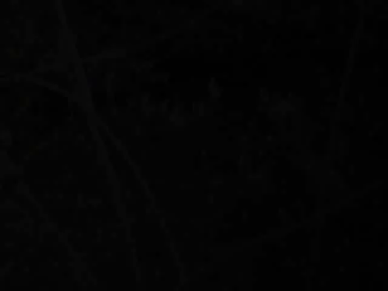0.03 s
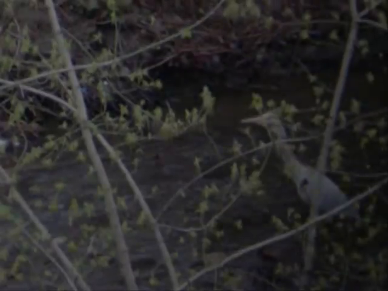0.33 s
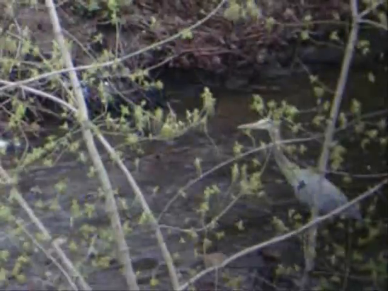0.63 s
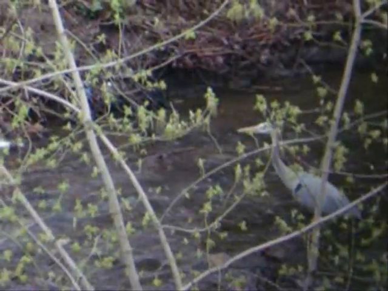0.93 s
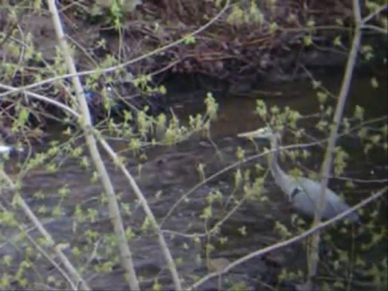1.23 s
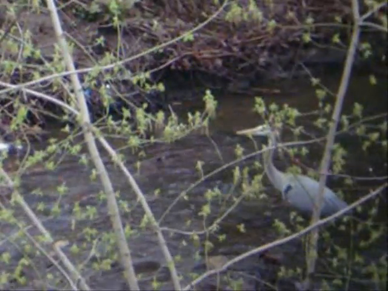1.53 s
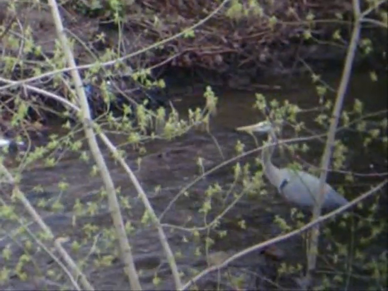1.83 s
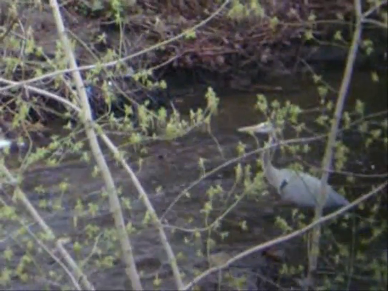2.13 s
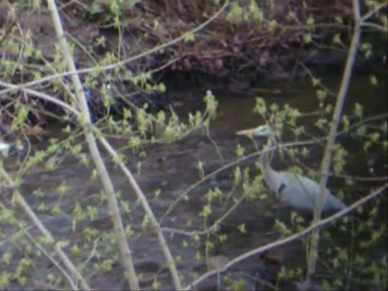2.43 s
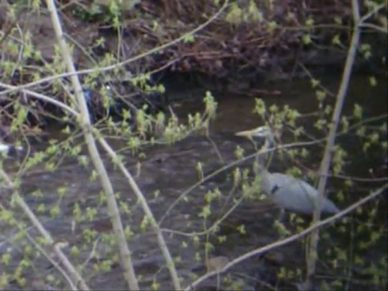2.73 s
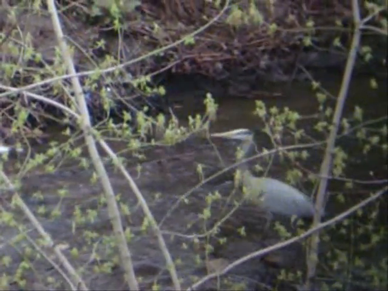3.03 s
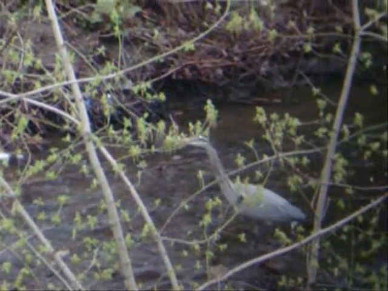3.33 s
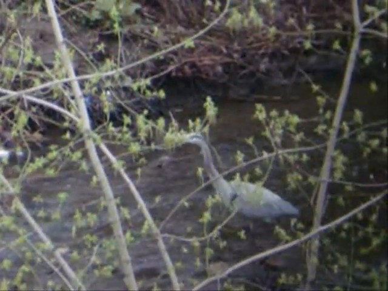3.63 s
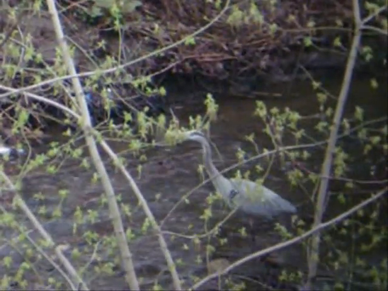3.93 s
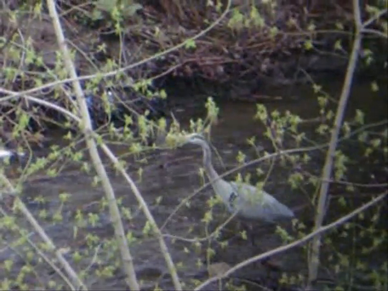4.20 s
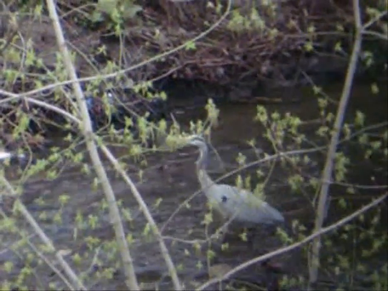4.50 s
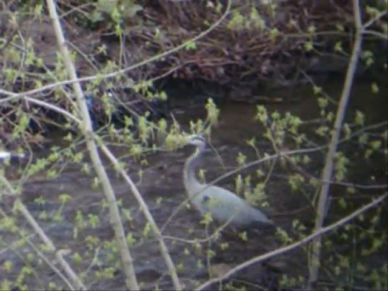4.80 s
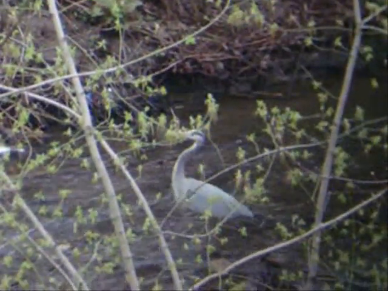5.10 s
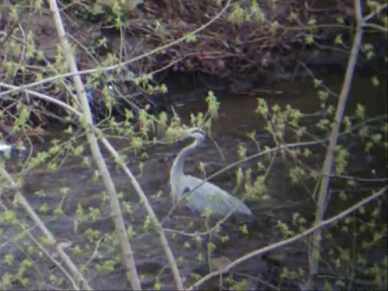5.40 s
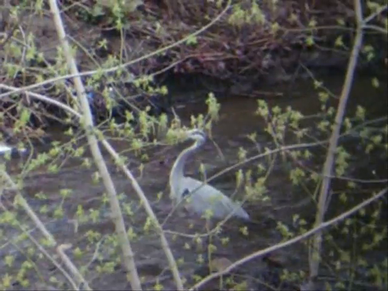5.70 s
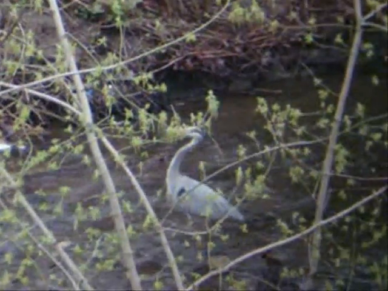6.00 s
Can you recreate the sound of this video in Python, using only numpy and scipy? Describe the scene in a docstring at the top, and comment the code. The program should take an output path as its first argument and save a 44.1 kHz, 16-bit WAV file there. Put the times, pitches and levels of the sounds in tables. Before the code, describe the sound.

A shallow creek rushes steadily over a low outdoor rumble, with faint songbird chirps and a thin camera motor whine.

```python
"""Woodland creek with songbirds

A shallow creek rushes over the low rumble of the open air: far bubbles merge into noise, nearer
ones ring as damped resonators. Songbirds call in gliding tones, scattered by trunks and banks.
A small camera picks it up: its motor whines and hums, its drive sets the case ticking,
its microphone is dull, and the sound fades in from silence."""
import sys
import numpy as np
from scipy import signal
from scipy.fft import rfft, irfft, next_fast_len
from scipy.io import wavfile

SR = 44100
rng = np.random.default_rng(int(sys.argv[2]) if len(sys.argv) > 2 else 0)


def store_pcm(level_fs):
    """Save levels as 16-bit WAV."""
    pcm = np.round(np.clip(level_fs, -1, 1) * 32767).astype(np.int16)
    wavfile.write(sys.argv[1], SR, np.atleast_2d(pcm).T)


N = 271215
TIME = np.arange(N) / SR
TURNS_PER_S = 14.985  # rotation of the camera's drive

# spectrum of the rushing current: (frequency [Hz], relative density [dB])
RUSH_SPECTRUM = [(150, -22), (340, -4), (500, -3.5), (630, 0), (870, -2.5), (1000, -10.5), (1200, -15),
                 (1420, -13), (1680, -24), (1900, -23.5), (2200, -21), (2650, -23), (3150, -27),
                 (4800, -31), (7000, -34.5)]


def from_db(db):
    """Amplitude ratio of a level in decibels."""
    return 10 ** (np.asarray(db) / 20)


def rms_one(x):
    """Normalisation to unit power."""
    return x / np.sqrt(np.mean(x ** 2) + 1e-20)


def gain_curve(spectrum):
    """Gain as a function of frequency: levels interpolated on a logarithmic axis."""
    known_hz, db = np.transpose(spectrum)
    return lambda hz: from_db(np.interp(np.log(np.maximum(hz, 1)), np.log(known_hz), db))


def filtered(x, gain_at):
    """Zero-phase filtering: the spectrum is multiplied by a gain curve."""
    size = next_fast_len(N + SR // 2)
    hz = np.arange(size // 2 + 1) * SR / size
    return irfft(rfft(x, size) * gain_at(hz), size)[:N]


def drift(corner_hz):
    """Slow random modulation: low-passed noise of about unit rms."""
    step, settling = 40, 2000
    pole = np.exp(-2 * np.pi * step * corner_hz / SR)
    white = rng.standard_normal(N // step + settling + 2)
    slow = signal.lfilter([1], [1, -2 * pole, pole * pole], white)[settling:]
    return np.interp(np.arange(N) / step, np.arange(len(slow)), rms_one(slow))


def noise(spectrum):
    """Spectral shaping turns white noise into coloured noise of unit rms."""
    return rms_one(filtered(rng.standard_normal(N), gain_curve(spectrum)))


def tone(hz):
    """A sinusoid of unit rms whose phase is the integral of its frequency."""
    return np.sqrt(2) * np.sin(2 * np.pi * (np.cumsum(hz) / SR + rng.random()))


def note(hz):
    """Amplitude modulation: a pure tone swells and dies under an arched envelope."""
    return np.sqrt(np.abs(np.sin(np.linspace(0, np.pi, len(hz))))) * tone(hz)


def ring(clicks, hz, t60):
    """Damped resonator: a unit impulse excites a decaying sine of unit amplitude."""
    r, w = np.exp(-np.log(1000) / (t60 * SR)), 2 * np.pi * hz / SR
    return signal.lfilter([0, np.sin(w)], [1, -2 * r * np.cos(w), r * r], clicks + 1e-18)


def ages(length):
    """Seconds since the onset of a sound."""
    return np.arange(int(length * SR)) / SR


def add(out, onset, sound):
    """Superposition of a sound at its onset in seconds."""
    start = int(onset * SR)
    out[start:start + len(sound)] += sound[:max(N - start, 0)]


def air(rumble_db=-30.5, swell_db=.5):
    """Coloured noise swells gently as a far rumble; two narrow noise bands waver in it as drones."""
    # rumble of the open air: (frequency [Hz], relative density [dB])
    rumble_spectrum = [(20, -24.5), (55, -18), (72, -7), (105, -4), (122, -0.5), (200, -0.5), (290, -2.5),
                       (380, -9.5), (600, -23.5), (1200, -44.5)]
    # low drones: (centre [Hz], half-width [Hz], rms level [dB])
    drones = [(121.8, 6.2, -43.5), (423, 25.4, -42)]
    out = from_db(rumble_db + swell_db * drift(4.5)) * noise(rumble_spectrum)
    for centre, width, db in drones:
        band = filtered(rng.standard_normal(N), lambda hz: 1 / (1 + ((hz - centre) / width) ** 2))
        out += from_db(db) * rms_one(band)
    return out


def motor(flutter=.00095, throb_db=1.46, hum_hz=43.3, hum_db=-47, hum_flutter=.013):
    """Modulation by rotation: the whine flutters with speed and throbs once a turn, over a deep hum."""
    # spectral lines of the motor: (frequency [Hz], rms level [dB])
    whine_lines = [(2546, -66), (3514, -64.5), (3638.5, -51), (3748, -63.5), (3874, -60), (4627, -72),
                   (4748, -71), (4826, -73), (5399, -76), (5426, -78), (5599, -77.5)]
    speed = 1 + flutter * drift(17.2)
    throb = from_db(throb_db * np.sin(2 * np.pi * TURNS_PER_S * TIME))
    whine = throb * sum(from_db(db) * tone(hz * speed) for hz, db in whine_lines)
    return whine + from_db(hum_db) * tone(hum_hz * (1 + hum_flutter * drift(5.0)))


def ticking(uneven_db=2.0):
    """Impact excitation: the drive's contacts recur every turn and ring the modes of the case."""
    # contacts of the drive: (delay from the start of a turn [s], impulse level [dB])
    contacts = [(0.043, -42.5), (0.0066, -49), (0.071, -52.5), (0.057, -53.5)]
    # modes of the camera's case: (frequency [Hz], gain [dB], t60 [s])
    case_modes = [(4400, -4, .003), (5000, -6.5, .004), (5560, -3, 0.0059)]
    clicks, turns = np.zeros(N), np.arange(0, N / SR, 1 / TURNS_PER_S)
    for delay, db in contacts:
        at = ((turns + delay) * SR).astype(int)
        at = at[at < N]
        clicks[at] += from_db(db + uneven_db * rng.standard_normal(len(at)))
    return sum(from_db(db) * ring(clicks, hz, t60) for hz, db, t60 in case_modes)


def twitters(per_s=4, length_s=.045, low_hz=2100, high_hz=2845, db=-54.5, spread_db=5.0):
    """Linear chirps: birds deep in the wood give short rising or falling notes at random times."""
    out, age = np.zeros(N), ages(length_s)
    for when, pitch, slope, strength in rng.random((int(per_s * N / SR), 4)):
        hz = low_hz + pitch * (high_hz - low_hz)
        glide = 1 + .072 * (2 * slope - 1) * age / length_s
        add(out, when * N / SR, from_db(db + spread_db * (strength - .5)) * note(hz * glide))
    return out


def whistles(slide_share=.05, slide_s=.014):
    """Exponential glide: the pure notes of far birds settle onto their pitch from above."""
    # thin notes: (time [s], duration [s], pitch [Hz], level [dB])
    notes = [(2.67, .04, 2710, -50), (3.415, .087, 3155, -51), (3.745, .085, 3105, -52.5),
             (4.91, .055, 2440, -51), (4.98, .077, 2140, -46.5), (5.609, .068, 2450, -48),
             (5.695, 0.052, 2170, -48), (5.695, .047, 3690, -52)]
    out = np.zeros(N)
    for onset, length, hz, db in notes:
        slide = 1 + slide_share * np.exp(-ages(length) / slide_s)
        add(out, onset, from_db(db) * note(hz * slide))
    return out


def reedy_call(onset_s=5.635, length_s=.11, pitch_hz=1583, sag_hz=6.0):
    """Harmonics of a missing, slightly sagging fundamental give one far call its reedy timbre."""
    # partials of the call: (harmonic number, level [dB])
    partials = [(3, -54.5), (4, -56)]
    out = np.zeros(N)
    fundamental = np.linspace(pitch_hz + sag_hz, pitch_hz - sag_hz, int(length_s * SR))
    for harmonic, db in partials:
        add(out, onset_s, from_db(db) * note(harmonic * fundamental))
    return out


def throat(hz, centre_hz=2150, half_width_hz=75, leak_db=-17):
    """Resonance of the songbird's throat: one steep peak of gain over a weak leak."""
    return np.hypot(from_db(leak_db), 1 / (1 + ((hz - centre_hz) / half_width_hz) ** 2))


def sweeps(steepness=6.6, swell_db=14):
    """Source and filter: a tone climbs an S-curve, shaped by the throat, as the bird pushes harder."""
    # upward sweeps: (time [s], duration [s], from [Hz], to [Hz], source level at midpoint [dB])
    rises = [(4.447, 0.064, 2260, 2710, -34.5), (5.869, .33, 1696, 2490, -39.5)]
    out = np.zeros(N)
    for onset, length, from_hz, to_hz, db in rises:
        progress = ages(length) / length - .5
        hz = from_hz + (to_hz - from_hz) / (1 + np.exp(-steepness * progress))
        add(out, onset, from_db(db + swell_db * progress) * throat(hz) * note(hz))
    return out


def slurs(rest_hz=1350, sag_hz=1060, plunge_hz=1260, waver_db=1.5):
    """Swept resonance: each accented tone plunges, flares at the throat's peak and trails off lower."""
    # the songbird's run of downward slurs: (time [s], level before the accent [dB])
    run = [(0.286, -37), (0.479, -36.5), (0.677, -36), (0.877, -35.5), (1.085, -34), (1.433, -32),
           (1.805, -34)]
    out = np.zeros(N)
    for onset, db in run:
        stretch = .86 + .12 * onset  # later slurs are drawn out
        age = ages(.09 * stretch) / stretch
        plunge = np.exp(-(age / .0098) ** 2)
        hz = rest_hz + sag_hz * np.exp(-age / .068) + plunge_hz * plunge
        attack = np.minimum(age / .004, 1)
        envelope = attack * np.exp(-age / .18) * throat(hz)
        accent_db = (27 - 11 * onset) * np.exp(-(age / .0058) ** 2)  # softens along the run
        level_db = db + accent_db + waver_db * drift(90.0)[:len(age)]
        add(out, onset, from_db(level_db) * envelope / envelope.max() * tone(hz))
    return out


def wood(calls, wet_db=-6.0, t60=.71):
    """Reverberation: trunks and banks scatter a short diffuse tail after each call."""
    age = ages(.5)
    tail = rng.standard_normal(len(age)) * np.exp(-np.log(1000) * age / t60)
    return calls + from_db(wet_db) * signal.fftconvolve(calls, tail / np.linalg.norm(tail))[:N]


def bubbles(flow, per_s=1500, spread_db=4.0, t60_cycles=14.3, pitches=28):
    """Bubble resonance: born at random, more often in strong flow, each rings for a few cycles."""
    strength = from_db(spread_db * np.minimum(rng.exponential(1, N), 4))
    polarity = rng.choice([-1, 1], N)
    born = rng.random(N) < per_s * flow / SR
    kicks = strength * polarity * born
    pitch_index = rng.integers(0, pitches, N)
    out = np.zeros(N)
    for k, hz in enumerate(np.geomspace(400, 5500, pitches)):
        out += hz * ring(kicks * (pitch_index == k), hz, t60_cycles / hz)
    return rms_one(filtered(out, gain_curve(RUSH_SPECTRUM)))


def creek(rush_db=-30.5, bubble_db=-38.5, surge_db=.32):
    """Incoherent sum: far bubbles merge into a rush, nearer ones give it grain; the flow drives both."""
    flow = from_db(surge_db * drift(3.0))
    return flow * (from_db(rush_db) * noise(RUSH_SPECTRUM) + from_db(bubble_db) * bubbles(flow))


def scene():
    """Superposition in one channel of water, air, the camera's drive and reverberant birdsong."""
    steady = creek() + air() + motor() + ticking()
    birds = slurs() + sweeps() + whistles() + reedy_call() + twitters()
    return (steady + wood(birds))[None, :]


def record(dry, mic_top_hz=5617, hiss_db=-84, fade_span_s=(.13, 2.2), cutoff_hz=15700):
    """Band limiting and self-noise: a dull microphone and faint electronics, faded in linearly."""
    # whistle of the camera's electronics: (frequency [Hz], rms level [dB])
    whistle_lines = [(6891, -91), (8269, -93.5), (9647, -90), (11025, -78), (12403, -93), (13781, -94)]
    dull = signal.sosfilt(signal.butter(15, mic_top_hz, fs=SR, output="sos"), dry)
    hiss = from_db(hiss_db) * rng.standard_normal(N)
    whistle = sum(from_db(db) * tone(np.full(N, hz)) for hz, db in whistle_lines)
    fade = np.interp(TIME, fade_span_s, [0, 1])
    band_limit = signal.ellip(10, .1, 80, cutoff_hz, fs=SR, output="sos")
    return signal.sosfilt(band_limit, fade * (dull + hiss + whistle))


dry = scene()
out = record(dry)
store_pcm(out)
```